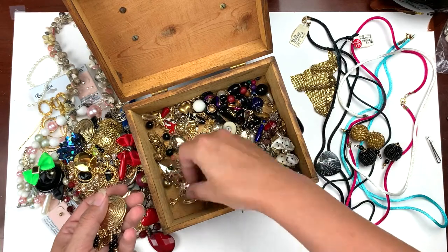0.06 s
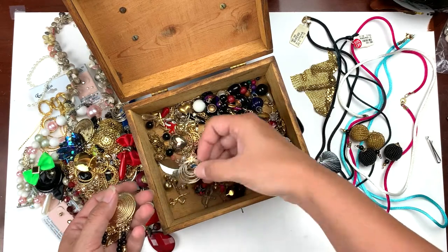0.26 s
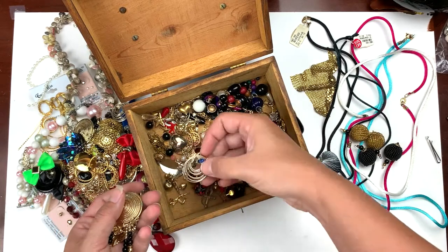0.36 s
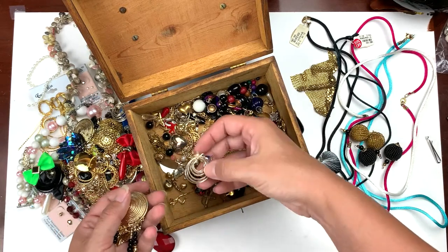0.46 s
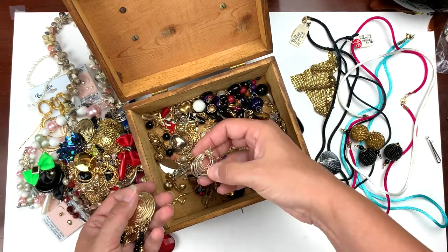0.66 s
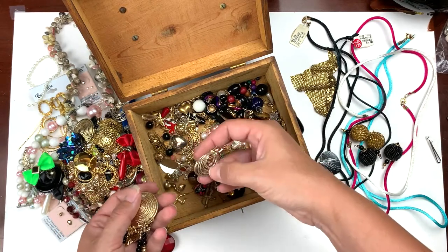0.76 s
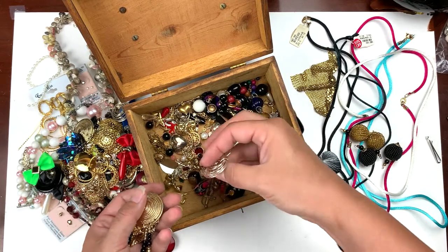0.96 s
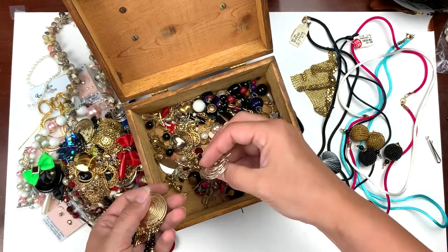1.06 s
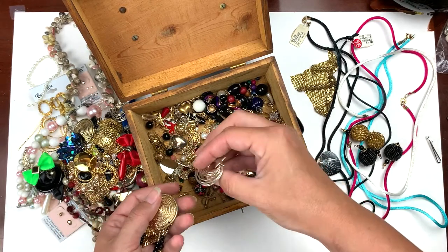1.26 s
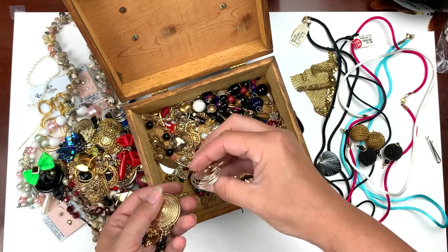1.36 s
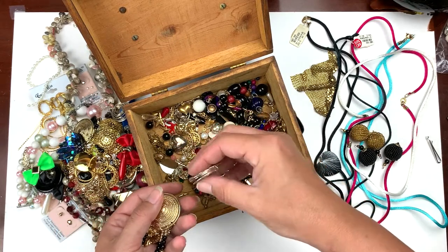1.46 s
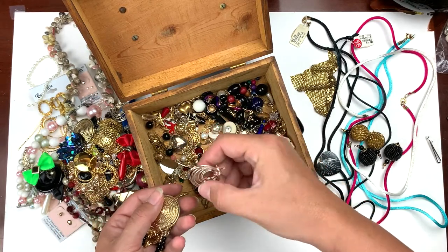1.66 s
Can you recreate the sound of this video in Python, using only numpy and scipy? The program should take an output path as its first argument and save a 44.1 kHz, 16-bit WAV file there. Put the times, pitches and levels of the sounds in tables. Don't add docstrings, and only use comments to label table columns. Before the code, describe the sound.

Coiled metal earring is lifted from a wooden jewelry box: light clinks build to a sharp rattle with bead taps, a pause, then a second denser jangle, then near quiet with low hum, close stereo phone microphone.

```python
import sys
import numpy as np
from scipy import signal
from scipy.fft import rfft, irfft
from scipy.io import wavfile
from scipy.ndimage import uniform_filter1d

SR = 44100
rng = np.random.default_rng(int(sys.argv[2]) if len(sys.argv) > 2 else 0)


def output_pcm(signal):
    pcm = np.clip(np.atleast_2d(signal).T, -1, 1) * 32767
    wavfile.write(sys.argv[1], SR, np.round(pcm).astype(np.int16))


def attenuation_scalar(level_db):
    decades = np.asarray(level_db, float) / 20
    return 10 ** decades


N = 74970
T = np.arange(N) / SR

# freq_hz, density_db
ROOM_SPECTRUM = [(150, -21), (250, -6), (795, -19.5), (1610, -16.5), (2160, -23), (2760, -21.5),
                 (12600, -35.5), (13700, -47), (15500, -41.5)]
# time_s, level_db
ROOM_LEVEL = [(0, -71.5), (.3, -62), (.7, -68), (.9, -60.5), (.99, -65.5), (1.4, -68), (1.55, -77.5),
              (1.7, -73.5)]
# freq_hz, density_db
RUMBLE_SPECTRUM = [(20, -33.5), (40, 12.5), (60, 12.5), (85, 17.5), (125, 14), (170, 6), (260, -3),
                   (520, -51)]
# time_s, cycle_hz, level_db
ENGINE = [
    (0, 26, -108),
    (.35, 27, -65),
    (.9, 28.04, -61),
    (1.4, 28.76, -62),
    (1.7, 30.07, -69),
]
# multiple, level_db
ENGINE_ORDERS = [(2, -9), (3, -4), (5, 0)]
# start_s, length_s, first_hz, last_hz, level_db
DOVE_COOS = [
    (0.062, 0.222, 369, 387, -66),
    (0.73, 0.09, 347, 360, -62.5),
    (0.803, .085, 369, 372, -61.5),
    (0.896, .16, 386.6, 343.6, -67),
]
# freq_hz, width_hz, level_db
RIM_MODES = [(1840, 19, 2.5), (2260, 70, 3), (2600, 50, -9.5), (4240, 70, -9.5), (4750, 50, 2.5),
             (4960, 50, -6), (5100, 40, -5), (5220, 40, -7)]
# freq_hz, width_hz, level_db
WALL_MODES = [(548, 40, -7.5), (705, 35, -3.5), (870, 100, -1), (1020, 40, 0.5), (1123, 40, -1.5),
              (1170, 50, 1), (1610, 45, -5), (1830, 45, -6), (2630, 50, -12)]
# time_s, level_db
RUB_FORCE = [(0, -79.5), (.07, -66.5), (.14, -92.5), (.99, -100), (1.02, -69), (1.09, -67), (1.18, -73.5),
             (1.3, -79), (1.4, -94)]
# time_s, level_db
SETTLE_FORCE = [(0, -80), (.2, -68.5), (.4, -78), (.7, -78.5), (.75, -64.5), (.8, -68), (.98, -87.5),
                (1.03, -71.5), (1.199, -66), (1.29, -63.5), (1.4, -74.5), (1.5, -78), (1.55, -92)]
# time_s, level_db
GRAZE_FORCE = [(1.17, -100), (1.19, -70), (1.22, -73), (1.261, -100)]
# freq_hz, level_db, t60_s
BOX_MODES = [(480, -21.5, .03), (735, -20.5, .03), (1047, -3, 0.045), (1253, -26.5, .025),
             (1793, 3.5, 0.028), (2075, 6.5, .02), (2330, -22, .02), (2645, -16.5, 0.02)]
# time_s, level_db, pitch_hz
WOOD_TAPS = [(0.249, -49, 1110), (0.284, -41, 2080), (0.3422, -28, 1603), (.3535, -27.5, 3748),
             (0.354, -35.5, 1300), (.358, -31.5, 2966), (0.397, -43.5, 1830), (0.55, -56, 830),
             (.75, -61, 705), (0.818, -33, 870), (.819, -33, 1003), (0.854, -38.5, 2260),
             (0.863, -33, 2380), (0.875, -33.5, 2080), (.884, -31.5, 1874), (0.888, -27.5, 2100),
             (0.938, -45, 1990)]
# time_s, level_db
ROLL_LEVEL = [(.15, -90.5), (.28, -57), (.37, -56.5), (.43, -88), (.8, -89.5), (.83, -54), (.87, -49),
              (.9, -61), (.95, -58), (.99, -101)]
# freq_hz, density_db
SCUFF_SPECTRUM = [(1300, -12.5), (2400, -2), (3100, -7), (3900, 2.5), (6500, -9.5)]
# time_s, level_db
STIR_LEVEL = [(0, -108), (.07, -81), (.16, -75.5), (.23, -54.5), (.33, -47.5), (.37, -50), (.41, -52),
              (.45, -74), (.53, -86), (.555, -50.5), (.6, -64), (.64, -79), (.808, -96), (.82, -43),
              (.88, -38), (.905, -55.5), (.955, -60), (.985, -90.5)]
# freq_hz, density_db
CHAIN_SPECTRUM = [(900, -34), (2200, -20.5), (3100, -23), (5300, -8.5), (6600, -21), (7800, 19.5),
                  (11000, 9.5), (16500, 4)]
# time_s, level_db, centre_hz
LINK_TICKS = [(.006, -58.5, 9800), (.037, -62, 9500), (0.084, -47.5, 13000), (.152, -55.5, 12900),
              (.174, -39.5, 15030), (0.179, -46.5, 8130), (0.295, -49.5, 5660), (.342, -31, 9500),
              (.3525, -29, 10000), (0.3534, -24.5, 3900), (.357, -38.5, 4500), (.3575, -32, 10500),
              (0.571, -38, 11000), (0.582, -43, 15000), (0.593, -51, 12630), (.551, -31.5, 10440),
              (.61, -53, 10940), (0.62, -41, 11700), (0.6517, -46, 8260), (.817, -31, 10220),
              (.836, -31.5, 10500), (.863, -36, 5000), (.8405, -30.5, 11000), (.845, -37, 14500),
              (.848, -44, 10500), (.855, -38, 9500), (.867, -30, 10500), (.874, -32, 11500),
              (0.8875, -20, 10000), (.889, -31, 13500), (.891, -30.5, 8000), (.9, -36.5, 12000),
              (0.918, -31, 13800), (0.926, -40.5, 8900), (0.941, -35, 11300), (1.337, -64.5, 11470)]
# freq_hz, level_db, t60_factor
EARRING_MODES = [(3800, -25, .6), (4400, -25, 1), (5000, -26, .8), (5560, -22, .8), (7580, -3, 1),
                 (7690, 0, 1), (7820, -5, .9), (8070, 0, .9), (8140, -6, .8), (12186, -6, 1),
                 (12570, -1, .8), (12700, -2, .8), (12800, 0, .8), (12880, -2, .8)]
# time_s, level_db, struck_ring_hz, t60_s
EARRING_CLINKS = [(.208, -45.5, 12800, 0.17), (0.224, -34.5, 7700, 0.016), (0.239, -32.5, 8070, 0.097),
                  (.246, -39, 12700, 0.057), (0.266, -33.5, 12600, 0.04), (.271, -30.5, 12190, 0.23),
                  (0.283, -28.5, 12800, 0.022), (.2935, -19, 12186, 0.084), (.301, -29, 8070, 0.032),
                  (.352, -16, 12700, 0.005), (.3538, -13.5, 12700, 0.012), (.355, -28, 7690, 0.03),
                  (.3575, -16.5, 12670, 0.027), (.3625, -22, 12300, 0.015), (.367, -25.5, 12900, 0.075),
                  (.3715, -40, 12600, 0.013), (.3745, -25, 12800, .03), (.379, -36, 13200, 0.025),
                  (0.382, -30, 7600, 0.057), (.400, -37, 7690, 0.017), (.527, -46.5, 7600, 0.019),
                  (0.5298, -51, 12700, 0.0077), (0.549, -37.5, 8080, 0.023), (0.558, -36, 12470, 0.05),
                  (.563, -36.5, 7900, 0.03), (.568, -32, 12680, 0.013), (.6515, -44, 8070, 0.014),
                  (.8185, -25, 12820, 0.063), (.825, -43, 7690, 0.015), (.823, -27.5, 12540, 0.057),
                  (0.8345, -17, 12900, 0.061), (0.84, -31.5, 7690, 0.045), (.8375, -23.5, 12130, 0.027),
                  (.846, -27.5, 12300, 0.042), (.855, -38, 7690, 0.023), (0.866, -35, 8070, 0.014),
                  (.874, -38.5, 8070, .03)]
LOW_PAN_DB = np.array([[-1.5], [1.5]])


def unit_rms(x):
    return x / np.sqrt(np.mean(x ** 2))


def unit_energy(x):
    return x / np.sqrt(np.sum(x ** 2))


def colour(x, points):
    point_hz, point_db = np.array(points).T
    hz = np.fft.rfftfreq(N, 1 / SR) + 1
    gain_db = np.interp(np.log(hz), np.log(point_hz), point_db, -90, -90)
    return unit_rms(irfft(rfft(x) * attenuation_scalar(gain_db), N))


def noise(points):
    return colour(rng.standard_normal(N), points)


def curve(rows, index=1):
    rows = np.array(rows)
    return np.interp(T, rows[:, 0], rows[:, index])


def walk(rate_hz):
    hold = int(SR / rate_hz)
    steps = np.repeat(rng.standard_normal(N // hold + 1), hold)
    w = uniform_filter1d(uniform_filter1d(steps, hold), hold)[:N]
    return (w - w.mean()) / w.std()


def ring(hz, db, t60_s, turn=0., choke=0.78):
    t = T[:SR // 6, None]
    decay = 1000. ** -(t / np.maximum(t60_s, .003)) ** choke
    return (attenuation_scalar(db) * decay * np.sin(2 * np.pi * (hz * t + turn))).sum(axis=1)


def grains():
    hit = rng.random(N) < 3800 / SR
    force = attenuation_scalar(2 * rng.exponential(size=N))
    return unit_rms(hit * force * rng.choice([-1, 1], N))


def add(out, s, x):
    i = int(s * SR)
    out[i:i + len(x)] += x[:N - i]


def ports(x, lag_s=.000207, turn_rad=-1.73):
    hz = np.fft.rfftfreq(N, 1 / SR)
    turn = turn_rad * (1 - .62 / (1 + (hz / 5500) ** 6))
    w = np.exp(1j * (np.pi * hz * lag_s + turn / 2))
    return np.array([irfft(rfft(x) / w, N), irfft(rfft(x) * w, N)])


def room():
    near_air_db, near_air_hz, patch_db, flicker_db = -4, 5000, 1.2, 1.8
    rumble_db, rumble_side_db = -58.5, -13.5
    octave = np.log2(np.fft.rfftfreq(N, 1 / SR) + 1)
    near = 1 / (1 + (near_air_hz / 2 ** octave) ** 4)
    diffuse = rfft([noise(ROOM_SPECTRUM), noise(ROOM_SPECTRUM)]) * (1 - .6 * near)
    both = diffuse + attenuation_scalar(near_air_db) * near * rfft(ports(noise(ROOM_SPECTRUM)))
    hiss = 0
    for mid in np.arange(7, 14.6, .25):
        band = irfft(both * np.maximum(1 - 4 * np.abs(octave - mid), 0), N)
        hiss = hiss + band * attenuation_scalar(patch_db * walk(4) + flicker_db * walk(20.26))
    side = attenuation_scalar(rumble_side_db) * noise(RUMBLE_SPECTRUM) * np.array([[1], [-1]])
    low = noise(RUMBLE_SPECTRUM) + side
    return hiss * attenuation_scalar(curve(ROOM_LEVEL)) + attenuation_scalar(rumble_db + LOW_PAN_DB) * low


def appliance():
    hum_hz, hum_db, wobble_db = 106.2, -46, 1
    hum = attenuation_scalar(hum_db + wobble_db * walk(7.4)) * np.sin(2 * np.pi * hum_hz * T + 1.0)
    return hum * attenuation_scalar(LOW_PAN_DB)


def vehicle():
    turn = 2 * np.pi * np.cumsum(curve(ENGINE)) / SR
    orders = sum(attenuation_scalar(db + 2 * walk(4.8)) * np.sin(k * turn) for k, db in ENGINE_ORDERS)
    return orders * attenuation_scalar(curve(ENGINE, index=2) + 8.5) * attenuation_scalar(LOW_PAN_DB)


def dove():
    out, waver = np.zeros(N), walk(30)
    for s, length_s, hz, end_hz, db in DOVE_COOS:
        u = np.arange(int(length_s * SR)) / (length_s * SR)
        pitch_hz = hz + (end_hz - hz) * u + 5 * waver[int(s * SR):][:len(u)]
        turn = 2 * np.pi * np.cumsum(pitch_hz) / SR
        tone = np.sin(turn) + 0.109 * np.sin(2 * turn)
        add(out, s, attenuation_scalar(db + 6.5) * np.sin(np.pi * u) ** .5 * tone)
    return ports(out * attenuation_scalar(3 * walk(28)), lag_s=0.0005, turn_rad=0)


def friction(modes, force):
    hz, x = np.fft.rfftfreq(N, 1 / SR), 0
    for mode_hz, width_hz, db in modes:
        resonance = 1 / (1 + 2j * (hz - mode_hz) / width_hz)
        band = irfft(rfft(grains()) * resonance, N) / np.sqrt(width_hz)
        x = x + attenuation_scalar(db + 3 * walk(12)) * band
    return ports(unit_rms(x) * attenuation_scalar(curve(force)))


def rubs():
    grazed = [(7690, 63, 0)]  # freq_hz, width_hz, level_db
    return friction(RIM_MODES, RUB_FORCE) + friction(WALL_MODES, SETTLE_FORCE) + friction(grazed, GRAZE_FORCE)


def taps():
    tap_db, own_t60_s, noise_db, noise_decay_s = -11, 0.029, 0.5, 0.008
    out = np.zeros((2, N))
    hz, db, t60_s = np.array(BOX_MODES).T
    for s, level_db, own_hz in WOOD_TAPS:
        c = rng.standard_normal((2, 2000))
        for ch in range(2):
            walls = ring(hz * (1 + 0.047 * c[0, :8]), db + 3 * c[ch, 8:16], t60_s, 0.22 * c[ch, 16:24])
            x = .5 * walls + ring(own_hz, 0., own_t60_s)
            thud = np.exp(-T[:2000] / noise_decay_s) * uniform_filter1d(c[ch], size=13)
            x[:2000] += attenuation_scalar(noise_db) * thud
            add(out[ch], s - .001, x * attenuation_scalar(level_db + tap_db))
    return out


def box_shake():
    response = unit_energy(ring(*np.array(BOX_MODES).T))
    return signal.fftconvolve(grains() * attenuation_scalar(curve(ROLL_LEVEL) - 3), response)[:N]


def bead_roll():
    shared, left, right = box_shake(), box_shake(), box_shake()
    grit = np.array([colour(grains(), SCUFF_SPECTRUM), colour(grains(), SCUFF_SPECTRUM)])
    return np.array([shared + left, shared + right]) + attenuation_scalar(curve(ROLL_LEVEL) - 3.5) * grit


def chain_crackle():
    brush_db, brush_t60_s = -0.5, .03
    gain = attenuation_scalar(curve(STIR_LEVEL))
    hz, db, t60_factor = np.array(EARRING_MODES).T
    response = unit_energy(ring(hz, db, brush_t60_s * t60_factor))
    brush = signal.fftconvolve(grains() * gain, response)[:N]
    return colour(grains(), CHAIN_SPECTRUM) * gain + attenuation_scalar(brush_db) * brush


def chain_spread():
    sides = np.array([colour(grains(), CHAIN_SPECTRUM), colour(grains(), CHAIN_SPECTRUM)])
    return attenuation_scalar(curve(STIR_LEVEL) - 8) * sides


def ticks():
    width, t60_s = 0.54, 0.011
    out = np.zeros(N)
    for s, level_db, centre_hz in LINK_TICKS:
        c = rng.standard_normal((3, 90))
        hz = centre_hz * (1 + width * c[0] * np.abs(c[0]) / 2)
        outside = (hz < 2000) | (hz > 16500)
        add(out, s, ring(hz, level_db - 20.5 + 2 * c[1] - 99 * outside, t60_s, c[2]))
    return out


def clinks():
    clink_db, rise_s, choke, detune = -10, .0003, 1.7, .003
    favour_db, favour_hz, scatter_db, others_t60_s = 9, 130, 4, .045
    loose_low_hz, loose_high_hz, loose_db, loose_t60 = 8500, 15330, -6.5, 0.87
    tick_db, tick_share = -8, 0.12
    out = np.zeros(N)
    hz, db, t60_factor = np.array(EARRING_MODES).T
    hiss = noise(CHAIN_SPECTRUM)
    for s, level_db, own_hz, t60_s in EARRING_CLINKS:
        a, b, c = rng.random((3, len(hz)))
        struck = np.exp(-((hz - own_hz) / favour_hz) ** 2)
        gains_db = db + favour_db * struck + scatter_db * (2 * a - 1)
        held_s = np.minimum(t60_s, others_t60_s)
        mode_t60_s = t60_factor * (held_s + struck * (t60_s - held_s))
        x = ring(hz * (1 + detune * (b - .5)), gains_db, mode_t60_s, c, choke)
        loose_hz = loose_low_hz + c * (loose_high_hz - loose_low_hz)
        x += ring(loose_hz, loose_db + 6 * b, held_s * loose_t60 * (.5 + a), a)
        tick = np.exp(-T[:2000] / (tick_share * held_s)) * hiss[int(s * SR):][:2000]
        x[:2000] += attenuation_scalar(tick_db) * tick * 2
        rise = 1 - np.exp(-T[:len(x)] / rise_s)
        add(out, s - .0005, x * rise * attenuation_scalar(level_db + clink_db))
    return out


def scene():
    echo_db, echo_t60_s = -16, .12
    background = room() + appliance() + vehicle() + dove() + rubs()
    metal = ports(chain_crackle() + ticks() + clinks())
    near = taps() + bead_roll() + chain_spread() + metal
    tail = rng.standard_normal((2, SR // 3)) * 1000. ** (-T[:SR // 3] / echo_t60_s)
    tail /= np.sqrt(np.sum(tail[0] ** 2))
    echo = signal.fftconvolve(near, tail, axes=1)[:, :N]
    return background + near + attenuation_scalar(echo_db) * echo


def band_limit(x):
    return signal.sosfilt(signal.butter(12, 17010, fs=SR, output="sos"), x)


def record(dry):
    top_cut = signal.ellip(6, .2, 35, 15900, fs=SR, output="sos")
    mix = signal.sosfilt(top_cut, dry)
    return band_limit(mix)


dry = scene()
out = record(dry)
output_pcm(out)
```